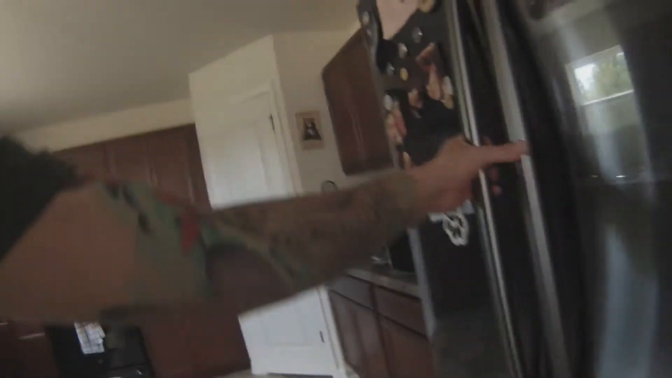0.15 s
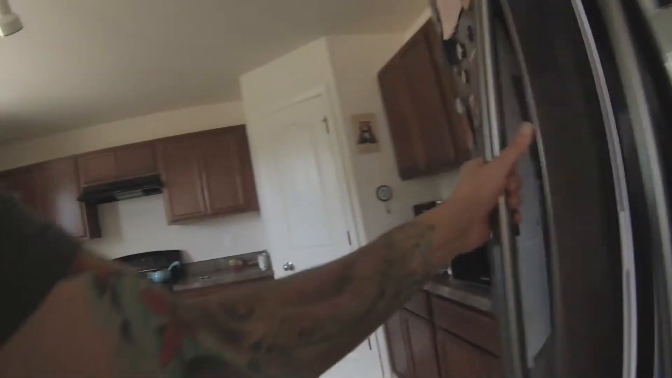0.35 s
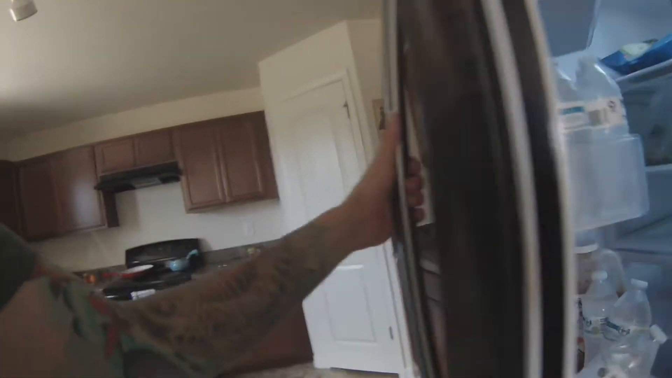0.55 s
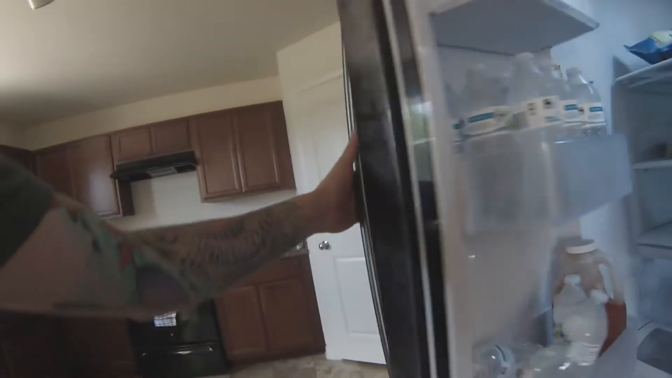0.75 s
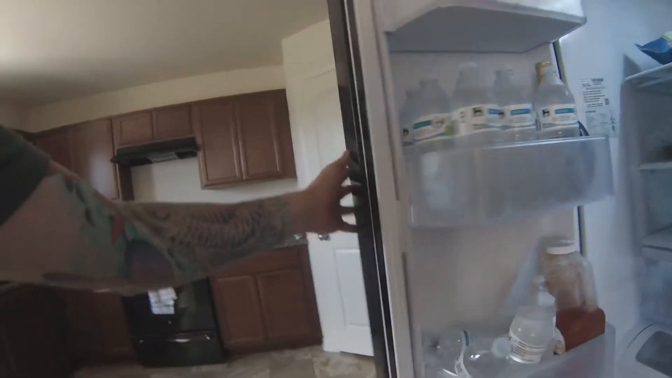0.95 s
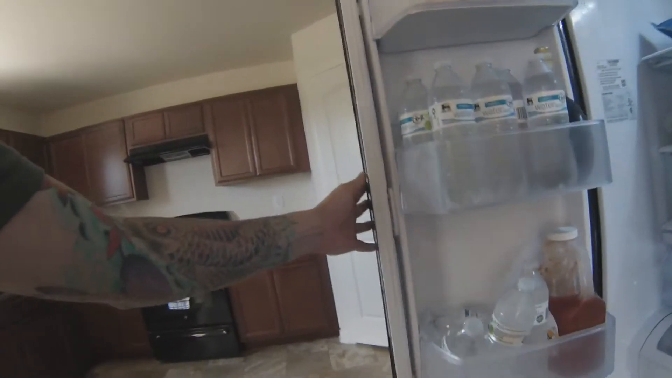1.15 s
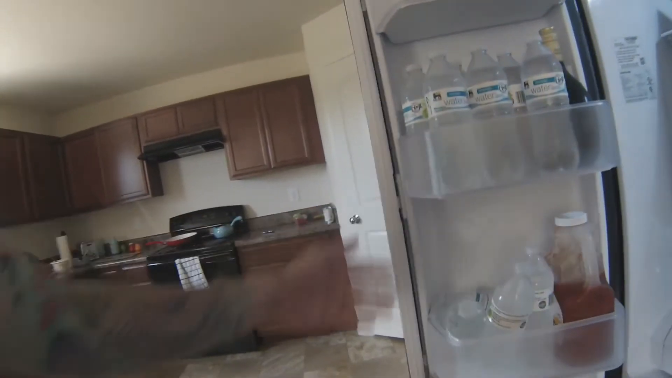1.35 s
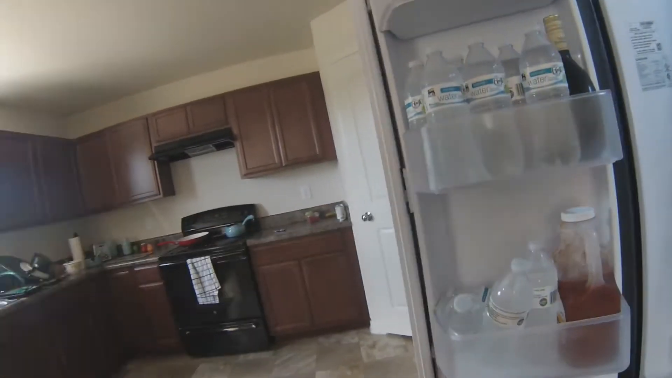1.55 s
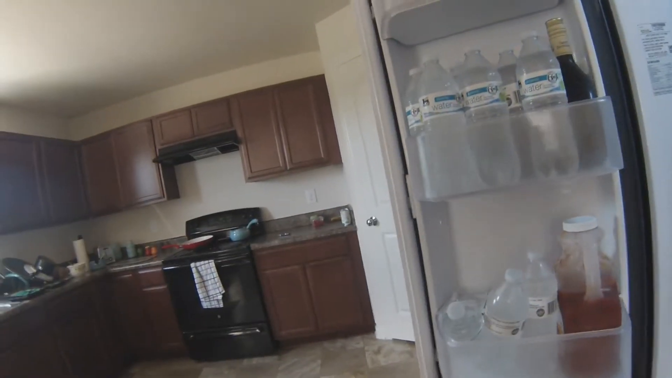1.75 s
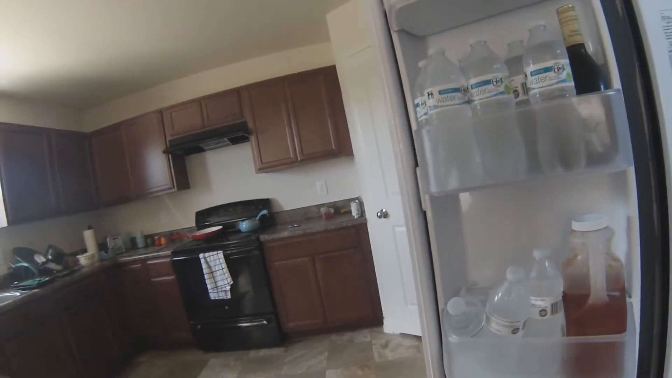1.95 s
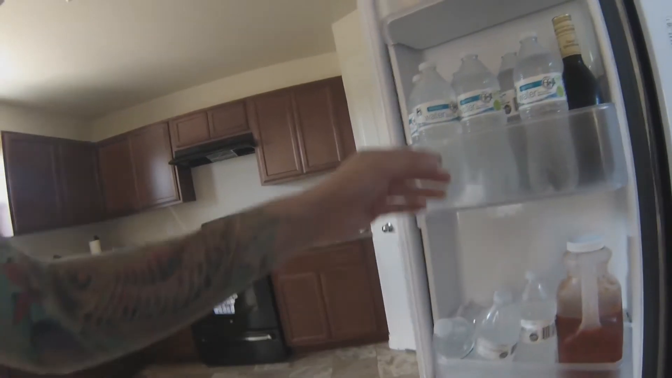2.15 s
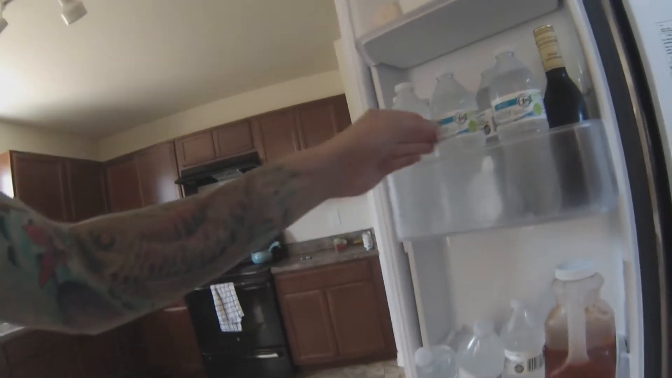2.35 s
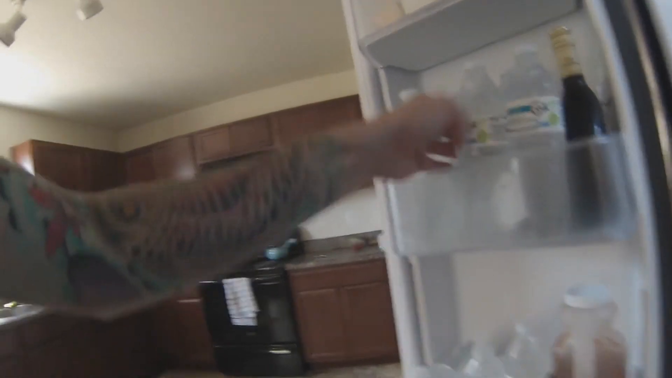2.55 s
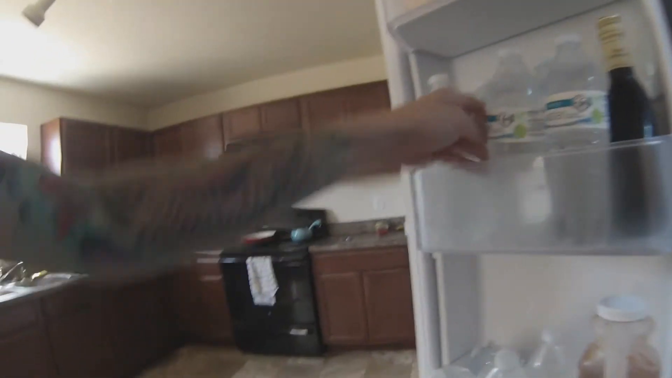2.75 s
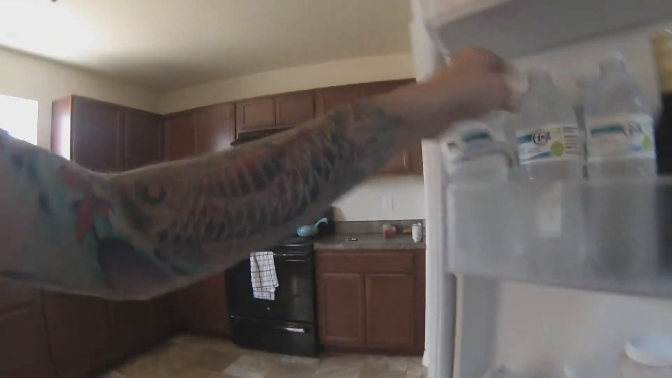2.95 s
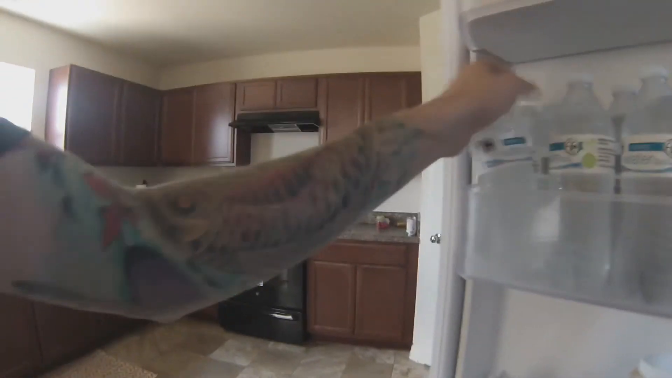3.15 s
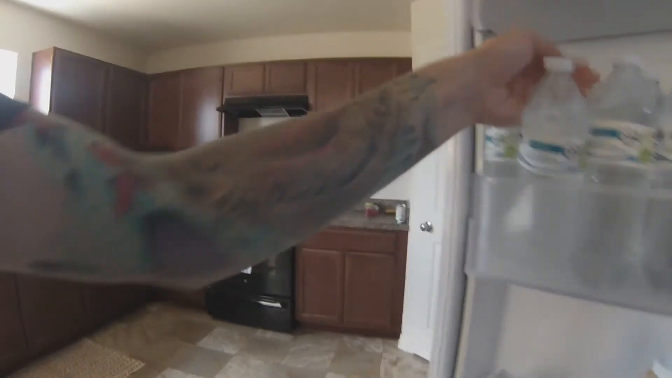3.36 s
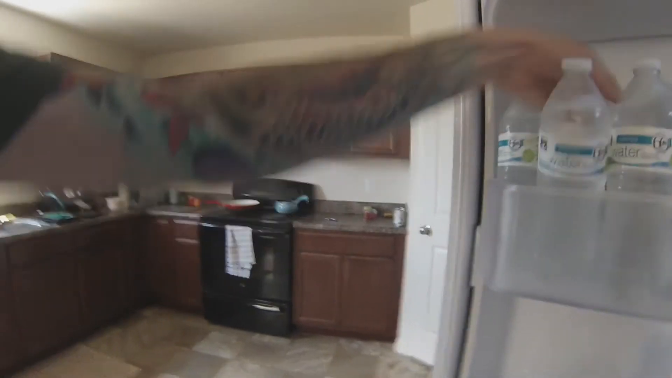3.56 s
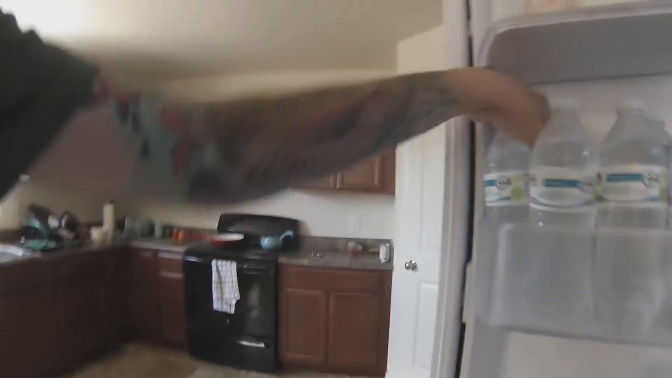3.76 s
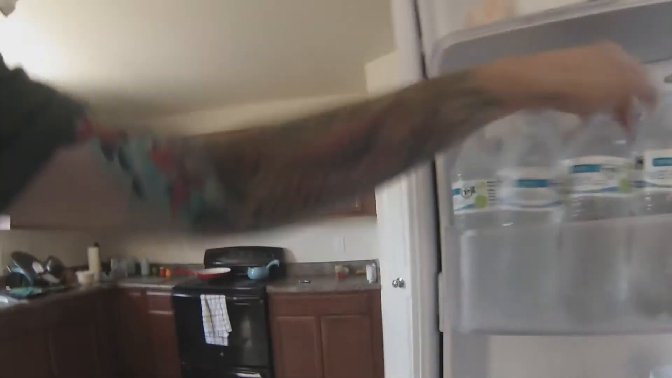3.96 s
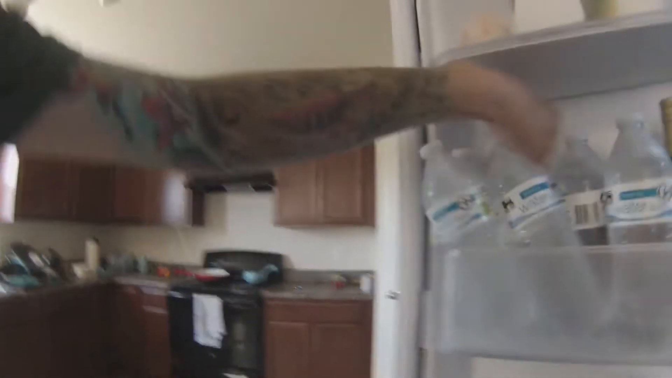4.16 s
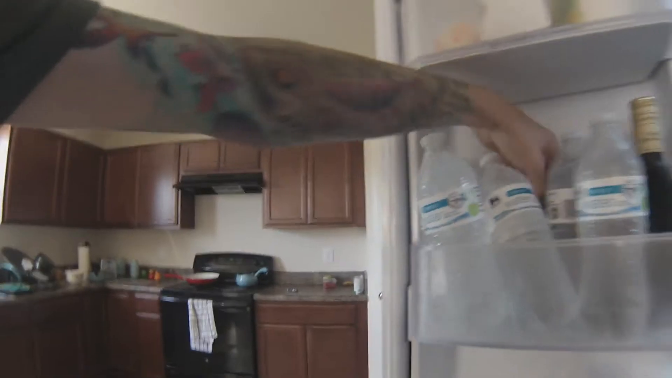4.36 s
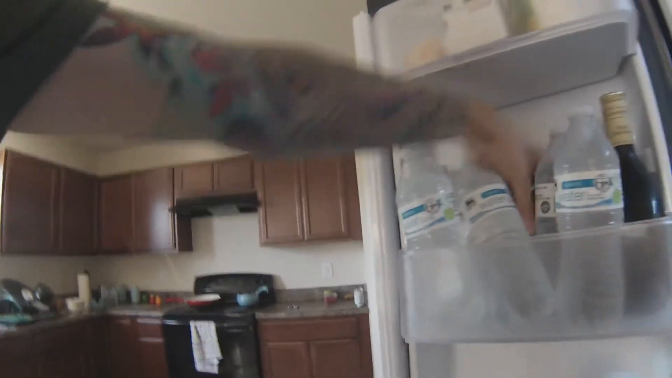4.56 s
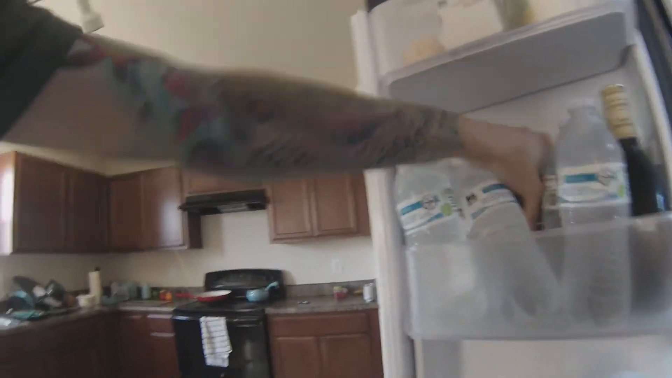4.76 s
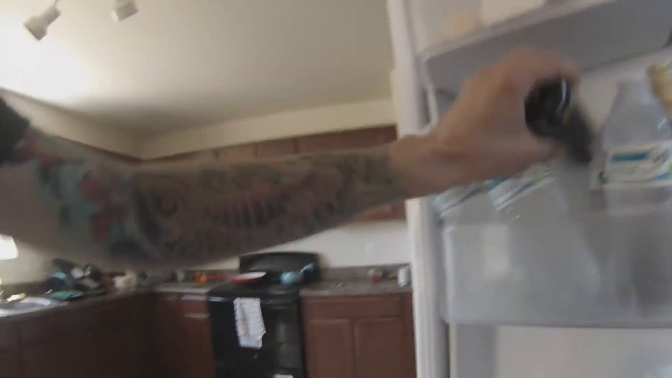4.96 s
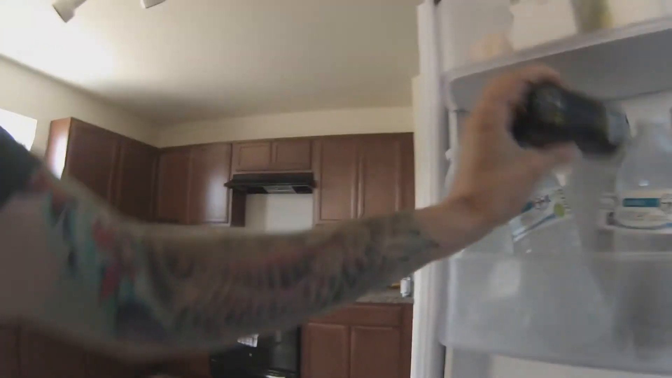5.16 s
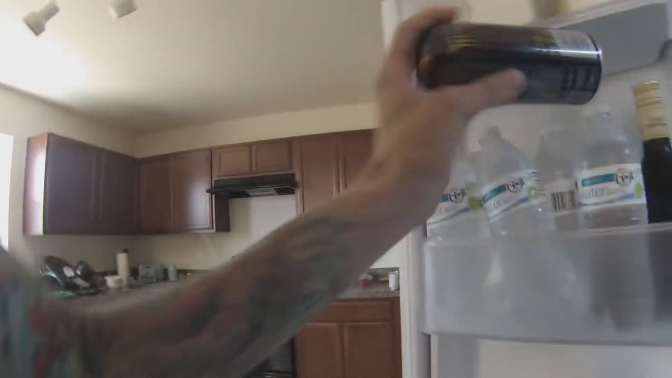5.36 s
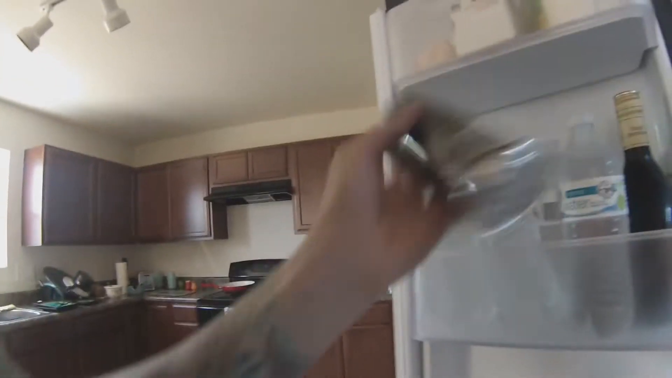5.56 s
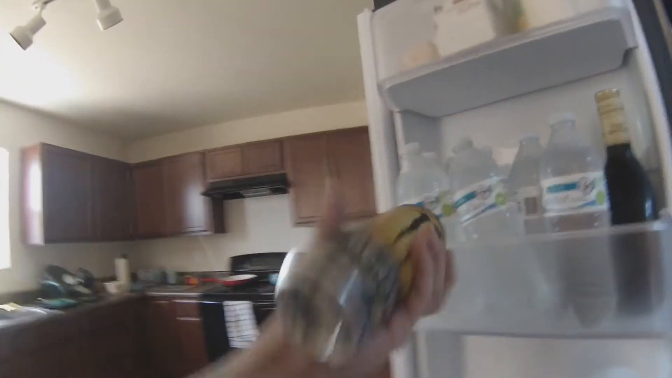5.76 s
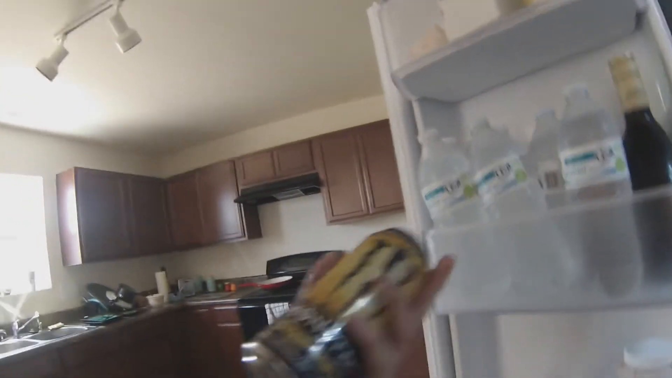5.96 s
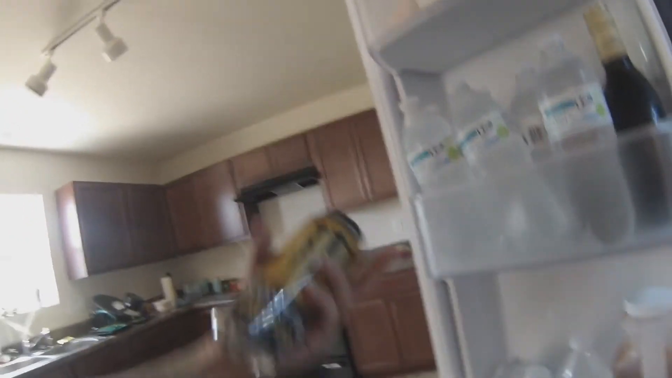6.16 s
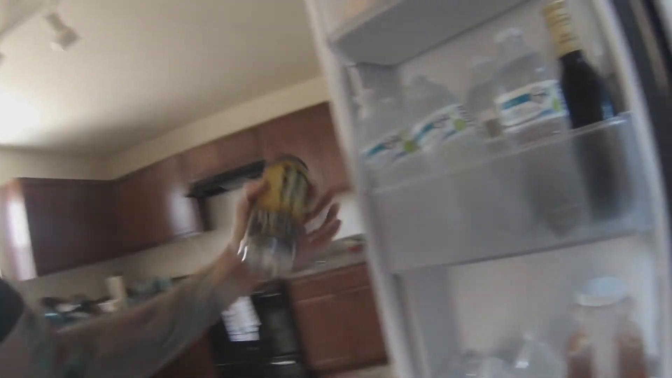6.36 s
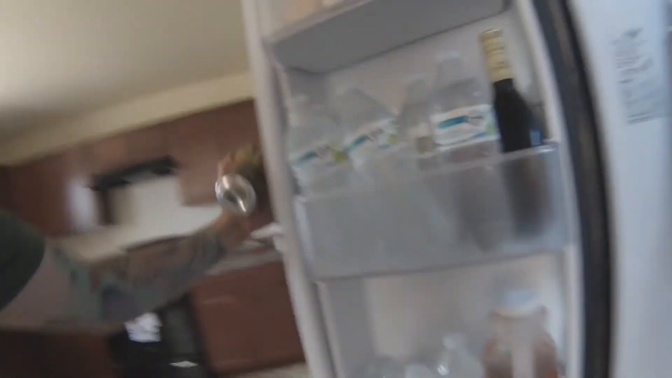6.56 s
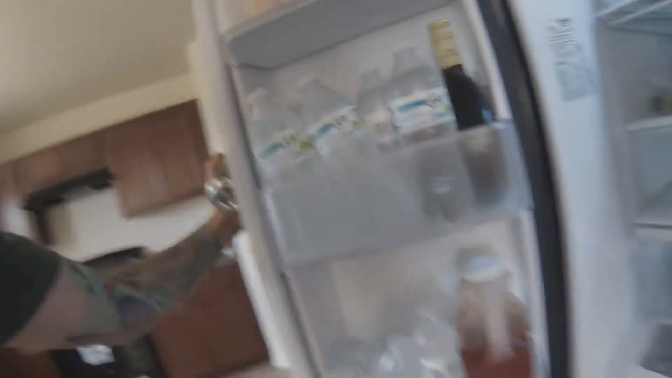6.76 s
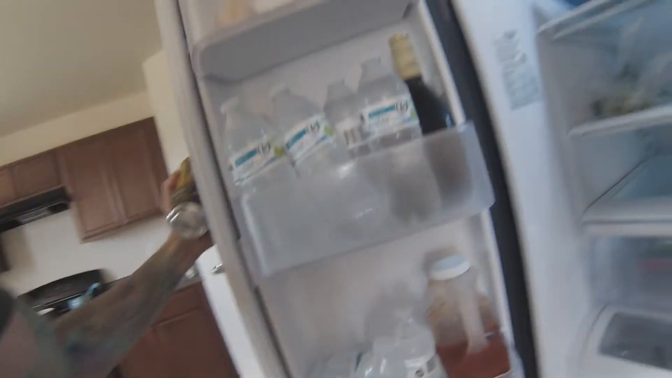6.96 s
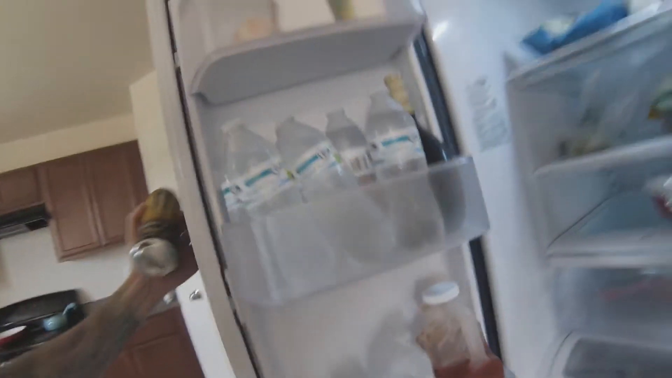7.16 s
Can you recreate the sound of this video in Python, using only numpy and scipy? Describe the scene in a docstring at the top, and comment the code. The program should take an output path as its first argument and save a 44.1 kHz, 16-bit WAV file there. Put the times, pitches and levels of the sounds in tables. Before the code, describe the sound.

A refrigerator door seal peels open with a few dull knocks. After a short lull, a hand digs among full plastic water bottles, which knock in the door bin while their thin shells crackle and rub. A can clinks free, and near the end a hand slaps the door. It is all close, in a slightly echoing kitchen, with soft bumps on a body-worn microphone and a faint fan rush.

```python
"""A hard-walled kitchen, at arm's length from the refrigerator, on a body-worn mono microphone.
The door seal peels open and a hand digs a can out from behind water bottles. Full bottles knock in the
plastic door bin and rock the door, their thin shells crackle and rub, and the can clinks free.
The hand slaps the door at the end. The microphone is bumped now and then, and the faint, steady rush
of the refrigerator fan and the room lies underneath."""
import sys
import numpy as np
from scipy import signal
from scipy.fft import rfft, irfft
from scipy.io import wavfile
from scipy.ndimage import uniform_filter1d, map_coordinates

SR = 44100
rng = np.random.default_rng(int(sys.argv[2]) if len(sys.argv) > 2 else 0)


def generate_wav(signal):
    """Clip the signal to [-1, 1] and save it as 16-bit WAV at the path in sys.argv[1]."""
    frames = np.transpose(np.atleast_2d(signal))
    scaled = np.clip(frames, -1, 1) * 32767
    pcm = np.round(scaled).astype(np.int16)
    wavfile.write(sys.argv[1], SR, pcm)


N = 321644
TIME = np.arange(N) / SR
# relative pitch spread from the hand's squeeze, the water in a bottle and the door's shifting load
GRIP_DETUNE, FILL_DETUNE, LOAD_DETUNE = 0.018, 0.01, 0.04


def undb(db):
    """Decibels to gain."""
    return 10 ** (np.asarray(db) / 20)


def unit(x):
    """Scale to rms 1."""
    return x / np.sqrt(np.mean(x ** 2))


def decay(t, t60):
    """Gain that falls by 60 dB every t60 seconds."""
    return np.exp(-np.log(1000) * t / t60)


def add(track, s, sound):
    """Mix a sound into the track at time s."""
    start = max(int(s * SR), 0)
    track[start:start + len(sound)] += sound[:max(N - start, 0)]


def band(x, lo_hz, hi_hz, order=2):
    """Causal band-pass."""
    sos = signal.butter(order, [lo_hz, min(hi_hz, SR / 2 - 1)], "band", fs=SR, output="sos")
    return signal.sosfilt(sos, x)


def swell(s, length, attack_s, release_s):
    """Gain of one movement: up 30 dB over attack_s, held from s for its length, down 30 per release_s."""
    outside = np.maximum(s - TIME, 0) / attack_s + np.maximum(TIME - s - length, 0) / release_s
    return undb(-30 * outside)


def body(modes, lo_hz, hi_hz, dense_db):
    """Impulse response of an object: its main modes over a flat bed that stands for crowded weak ones."""
    t = np.arange(SR // 8) / SR
    ring = undb(dense_db) * (t == 0)
    for hz, width, db in modes:
        gain = undb(db) * 2 * np.pi * width / SR
        ring += gain * np.exp(-np.pi * width * t) * np.cos(2 * np.pi * hz * t)
    return band(ring, lo_hz, hi_hz)


def detuned(ring, spread):
    """The same ring a little higher or lower: no two bottles or grips are alike."""
    speed = np.exp(spread * rng.standard_normal())
    return map_coordinates(ring, [np.arange(len(ring)) * speed], order=3)


def spot(ring, hz, span, rest_db):
    """An object's ring when struck where the modes near one pitch answer most."""
    return band(ring, hz / (1 + span), hz * (1 + span), order=1) + undb(rest_db) * ring


def strike(ring, t60, build_s, push):
    """One contact: a first push, then a swelling and dying chatter of tiny impacts, rings an object."""
    t = np.arange(SR // 5) / SR
    chatter = rng.standard_normal(len(t)) * decay(t, t60) * (1 - np.exp(-t / build_s)) ** 2
    force = chatter / np.linalg.norm(chatter) + push * (t == 0)
    sound = signal.fftconvolve(force, ring)
    return sound / np.sqrt(uniform_filter1d(sound ** 2, size=512).max())  # loudest moment at rms 1


def grains(ring, rate, spread_db):
    """Stick-slip: random little slips of uneven size, `rate` a second, ring an object."""
    size = undb(spread_db * np.minimum(rng.exponential(size=N), 4))
    slips = (rng.random(N) < rate / SR) * size * rng.choice([-1, 1], N)
    return unit(signal.fftconvolve(slips, ring)[:N])


# room tone all around the microphone: (frequency [Hz], relative spectral level [dB])
ROOM_TONE = [(15, -10.5), (25, -2.5), (53, -0.5), (108, -13.5), (166, -7), (263, -14), (427, -8),
             (463, -13), (516, -11), (624, -15.5), (695, -13), (2760, -23.5), (3250, -25), (11600, -40),
             (16000, -48)]
def room_tone():
    """Steady rush of the refrigerator fan and the room."""
    hz, db = np.transpose(ROOM_TONE)
    freqs = np.maximum(np.fft.rfftfreq(N, 1 / SR), 1)
    colour = undb(np.interp(np.log(freqs), np.log(hz), db))
    return undb(-55) * unit(irfft(rfft(rng.standard_normal(N)) * colour, N))


# echo off the hard surfaces around the microphone: (frequency [Hz], t60 [s], relative level [dB])
KITCHEN_ECHO = [(100, 0.24, -3), (252, 0.38, -4.5), (700, 0.33, -7), (1800, 0.44, -7.5), (4800, 0.33, -6.5),
                (12000, 0.27, -4.5)]
def kitchen_echo(x, build_s=0.0032, positions=20):
    """Dense echo of cabinets, floor and walls; its fine pattern changes as arm and microphone move."""
    t = np.arange(2 * SR // 3) / SR
    hz, t60s, dbs = np.transpose(KITCHEN_ECHO)
    echoes = np.zeros((positions, len(t)))
    for octave_hz in 63 * 2. ** np.arange(9):
        t60, db = (np.interp(np.log(octave_hz), np.log(hz), column) for column in (t60s, dbs))
        fade = decay(t, t60) * (1 - np.exp(-(t / build_s) ** 2))
        noise = band(rng.standard_normal(echoes.shape), octave_hz / 2 ** .5, octave_hz * 2 ** .5, order=3)
        echoes += undb(db) * fade / np.linalg.norm(fade) * noise
    out, hop = np.zeros(N), N // positions
    for k, echo in enumerate(echoes):
        piece = x[k * hop:(k + 2) * hop]
        crossfade = np.sin(np.linspace(0, np.pi, len(piece)))
        add(out, k * hop / SR, signal.fftconvolve(piece * crossfade, echo))
    return out


# the microphone's mount creaks dully as the arm swings the door: (time [s], length [s], level [dB])
MOUNT_SWAYS = [(0.91, 0.275, -47.5), (3.102, 0.051, -46)]
def mount_sway():
    """The mount shifts in small, uneven slips that make a low rattle."""
    mount = body([(32.7, 14, 4), (70, 30, -13)], 9.3, 170, dense_db=-7)
    gain = sum(undb(db) * swell(s, length, 0.31, 0.083) for s, length, db in MOUNT_SWAYS)
    return grains(mount, rate=90, spread_db=6.5) * gain


# soft bumps right on the microphone's body: (time [s], level [dB], pitch [Hz], t60 [s])
MIC_BUMPS = [(.873, -39, 75.6, 0.073), (0.995, -36, 56, 0.21), (1.147, -30.5, 91.5, 0.031),
             (1.177, -36, 52.7, 0.11), (2.197, -35.5, 241, 0.024), (3.108, -23, 115, 0.033),
             (3.142, -19, 87.5, 0.023), (5.05, -31.5, 55.4, 0.062)]
def mic_bumps(rise_s=0.00062):
    """A nudge rocks the microphone's mount for a few cycles, and clothing rubs dully against it."""
    out, t = np.zeros(N), np.arange(SR // 3) / SR
    for s, db, hz, t60 in MIC_BUMPS:
        rock = 2 * np.sin(2 * np.pi * hz * t) * decay(t, t60)
        rub = undb(-11.5) * unit(band(rng.standard_normal(len(t)), 34, 132)) * decay(t, 0.32)
        add(out, s, undb(db) * (rock + rub) * (1 - np.exp(-t / rise_s)))
    return out


# fingers shifting their grip on the door, an arm's length away: (time [s], length [s], level [dB])
FINGER_GRIPS = [(0, .11, -65.5), (0.705, 0.36, -76), (1.297, 0.073, -74), (7.005, 0.21, -71)]
def finger_rustle(edge):
    """Skin creeps over the handle and the door's edge with a faint, dry rustle."""
    rustle = unit(band(grains(edge, rate=2000, spread_db=-1), 9700, 14400, order=1))
    return rustle * sum(undb(db) * swell(s, length, 0.05, 0.075) for s, length, db in FINGER_GRIPS)


# the seal peeling off in front of the microphone: (time [s], relative level [dB])
SEAL_PEEL = [(0, -47.5), (.1, -58), (.24, -44.5), (.42, -54.5), (.65, -61.5)]
def door_seal(door_bin, bottle, shell, edge):
    """The rubber seal lets go in small tears over a low suck of air."""
    tears = (undb(-4.5) * grains(door_bin, rate=500, spread_db=0.5)
             + undb(-7) * grains(bottle, rate=570, spread_db=1)
             + undb(-13.5) * grains(shell, rate=270, spread_db=2)
             + undb(-19.5) * grains(edge, rate=1400, spread_db=2))
    suction = undb(-4) * unit(band(rng.standard_normal(N), 34, 156))
    s, db = np.transpose(SEAL_PEEL)
    return (tears + suction) * undb(np.interp(TIME, s, db, left=-120, right=-120))


# the open door rocks on its hinges when weight shifts in the bin: (time [s], level [dB])
DOOR_SHUDDERS = [(2.469, -40.5), (2.921, -39.5), (3.33, -35.5), (3.499, -43.5), (3.761, -40), (3.991, -31),
                 (4.25, -40), (4.54, -39), (4.79, -47.5), (5.12, -44.5), (5.44, -43.5)]
def door_shudders(swing_hz=58.2, rise_s=0.005, t60=0.96):
    """The heavy door swings briefly at its lowest mode; shelves and hinges rumble along."""
    out, t = np.zeros(N), np.arange(SR) / SR
    fade = (1 - np.exp(-t / rise_s)) * decay(t, t60)
    for s, db in DOOR_SHUDDERS:
        swing = detuned(np.sin(2 * np.pi * swing_hz * t), LOAD_DETUNE)
        rumble = undb(-4) * unit(band(rng.standard_normal(len(t)), 44, 120))
        add(out, s, undb(db) * fade * (swing + rumble))
    return out


# resonances of the door's panel and skin: (frequency [Hz], width [Hz], level [dB])
PANEL_MODES = [(56, 10, 9.1), (170.5, 29, 13), (226, 26, 4), (330, 59, 5)]
SKIN_MODES = [(820, 200, 7.5), (1430, 300, 1), (1820, 180, -12), (2080, 99, -20)]
# hand and can bump the door close by: (time [s], relative boom [dB], relative clank [dB], chatter t60 [s])
DOOR_BLOWS = [(.035, -38, -63, 0.047), (0.14, -32.5, -37, 0.11), (0.243, -48, -29, .05),
              (.302, -33, -37, 0.083), (0.413, -30.5, -62, .09), (1.051, -36.5, -52, 0.089),
              (1.321, -35.5, -35, 0.38), (1.383, -37, -48, 0.12), (6.7535, -17, -12.5, 0.031),
              (6.771, -17.5, -30, 0.052), (6.803, -30.5, -27.5, 0.32), (6.961, -37, -58, 0.044),
              (7.004, -24.5, -46, 0.053)]
def door_blows(boom_gain_db, clank_gain_db):
    """The foam-filled panel booms and its steel skin gives a short, dull clank."""
    panel = body(PANEL_MODES, 32, 370, dense_db=-2.5)
    skin = body(SKIN_MODES, 660, 2500, dense_db=-5)
    out = np.zeros(N)
    for s, boom_db, clank_db, t60 in DOOR_BLOWS:
        add(out, s, undb(boom_db + boom_gain_db) * strike(panel, t60, build_s=0.0034, push=0.27))
        add(out, s, undb(clank_db + clank_gain_db) * strike(skin, t60, build_s=0.00088, push=0.07))
    return out


# resonances of the can's lid: (frequency [Hz], width [Hz], level [dB])
LID_MODES = [(3100, 110, 2), (4500, 260, -5)]
def lid_ping(s=4.887, db=-34.5):
    """The can's thin lid answers the flick of a fingertip with a short ping."""
    lid = body(LID_MODES, 2000, 9000, dense_db=-24)
    out = np.zeros(N)
    add(out, s, undb(db) * strike(lid, t60=0.0064, build_s=0.00086, push=0.88))
    return out


# resonances of the full can and of its hard rim: (frequency [Hz], width [Hz], level [dB])
CAN_MODES = [(947, 36, 6.5), (1000, 40, 1), (1055, 40, 1.5), (1230, 27, 0), (1850, 110, -13),
             (2200, 95, -16)]
RIM_MODES = [(1750, 180, 9.2), (2820, 200, 5.1), (3580, 270, 12), (3950, 230, 3), (4730, 260, 8),
             (5100, 200, 6.3), (6330, 130, 8.5)]
# at arm's length the can clicks free of the bottles, then knocks against them as it is tipped out:
# (time [s], clonk level [dB], clink level [dB], chatter t60 [s], build-up [s])
CAN_KNOCKS = [(4.973, -37, -19.5, 0.029, 0.000059), (5.007, -35.5, -48, 0.031, 0.0028),
              (5.281, -20.5, -38, 0.036, 0.0013), (5.295, -31.5, -53, 0.097, 0.00064)]
def can_knocks():
    """The full can gives a hollow clonk when its side is hit and a bright clink when its rim catches."""
    side = body(CAN_MODES, 880, 2800, dense_db=-16)
    rim = body(RIM_MODES, 1150, 13500, dense_db=-12)
    out = np.zeros(N)
    for s, clonk_db, clink_db, t60, build_s in CAN_KNOCKS:
        hardness = np.exp(-build_s / 0.0013)
        add(out, s, undb(clonk_db) * strike(side, t60, build_s, push=2 * hardness))
        add(out, s, undb(clink_db) * strike(rim, t60, build_s, push=0.59 * hardness))
    return out


# resonances of the plastic in the open door: (frequency [Hz], width [Hz], level [dB])
BIN_MODES = [(181.3, 30, 1), (219, 28, 0), (273, 13, -2), (355, 60, -3.5), (396, 63, -0.5),
             (457, 17, -11.5)]
BOTTLE_MODES = [(623, 28, 9.7), (710, 17.5, 11.7), (795, 98, 9.2), (885, 86, 5.6), (1000, 160, 3.6),
                (1170, 123, 6.2), (1258, 12, 2.2)]
SHELL_MODES = [(1800, 100, 6.7), (1920, 190, 6.8), (2240, 190, 5), (2630, 320, 1.9), (3007, 470, 4.5),
               (3606, 82, 4.2), (3910, 81, 2.7)]
EDGE_MODES = [(4540, 410, 3), (5190, 1300, 5.5), (5800, 270, 0), (6450, 210, 1), (7870, 2700, -4),
              (10300, 3800, -21), (13800, 2800, -9.5)]
def plastic_rings():
    """Impulse responses of the door bin, a full bottle, its thin shell and a crack's treble edge."""
    return (body(BIN_MODES, 97, 504, dense_db=-5), body(BOTTLE_MODES, 610, 1380, dense_db=0),
            body(SHELL_MODES, 1450, 5000, dense_db=0), body(EDGE_MODES, 3200, 14100, dense_db=-10))


# close by, the hand drags bottles against each other and the bin:
# (time [s], length [s], relative rubbing [dB], relative crinkling [dB])
BOTTLE_DRAGS = [(2.481, 0.063, -33.5, -44.5), (2.915, 0.046, -34.5, -43.5), (3.282, 0.069, -27, -37.5),
                (3.615, 0.54, -36, -47), (4.118, 0.16, -28, -41.5), (4.496, 0.16, -39.5, -53.5),
                (4.765, .08, -41.5, -50), (4.838, .18, -39, -47), (5.165, .29, -38.5, -59)]
def bottle_drags(door_bin, bottle, shell, edge):
    """Heavy bottles judder along the bin while shells and labels crinkle in a stream of small snaps."""
    rub_gain, crinkle_gain = np.zeros(N), np.zeros(N)
    for s, length, rub_db, crinkle_db in BOTTLE_DRAGS:
        movement = swell(s, length, attack_s=0.16, release_s=0.38)
        rub_gain = np.maximum(rub_gain, undb(rub_db) * movement)
        crinkle_gain = np.maximum(crinkle_gain, undb(crinkle_db) * movement)
    rub = (undb(-6) * grains(door_bin, rate=500, spread_db=1)
           + undb(-9.5) * grains(bottle, rate=870, spread_db=0))
    crinkle = (undb(-6) * grains(shell, rate=1400, spread_db=4)
               + undb(-10) * grains(edge, rate=400, spread_db=2.5))
    snap = strike(shell + undb(-8.5) * edge, t60=0.022, build_s=0.0016, push=0.046)
    crinkle += undb(-6) * grains(snap, rate=180, spread_db=6)
    return rub * rub_gain + crinkle * np.hypot(crinkle_gain, creasing())


# at arm's length, thin plastic buckling under the hand, and the sharp click of the closing door slap:
# (time [s], relative level [dB], ring pitch [Hz], relative treble edge [dB], build-up [s])
CRACKS_AND_CLICKS = [(0.242, -29, 2600, -22, 0.0012), (0.7562, -49, 2460, -1.5, 0.00093),
                     (1.3334, -33, 1800, -13.5, 0.00067), (1.385, -41.5, 4180, -15, 0.00091),
                     (1.6967, -33.5, 1720, -15, 0.0011), (2.459, -32, 1850, -9, 0.00053),
                     (2.496, -26, 1640, -19, .004), (2.563, -31, 1750, -13, 0.0017),
                     (2.614, -33.5, 2000, -36, 0.0018), (2.823, -25.5, 1900, -35, 0.00063),
                     (2.8833, -32.5, 3630, -5, 0.0021), (2.902, -16.5, 2580, -13, 0.0011),
                     (2.911, -22.5, 2670, -8.5, 0.0013), (2.9698, -34, 1960, -3.5, .002),
                     (3.025, -34.5, 2400, -29, .001), (3.103, -32.5, 4000, -17, 0.00089),
                     (3.195, -28.5, 3700, -3, 0.00086), (3.269, -16.5, 1770, -9, 0.00083),
                     (3.288, -21.5, 1870, -11, 0.0016), (3.302, -11, 2940, -18, 0.00067),
                     (3.3276, -11, 2680, -20, 0.0016), (3.3566, -18.5, 1970, -11, 0.00054),
                     (3.446, -43, 1820, -12, 0.0009), (3.564, -27, 2070, -15.5, 0.00062),
                     (3.617, -33, 2300, -12, .002), (3.633, -23, 2240, -6.5, 0.0036),
                     (3.674, -28.5, 3850, -10, 0.0014), (3.703, -30.5, 2100, -28, 0.0016),
                     (3.767, -15.5, 2220, -13.5, 0.0012), (3.8228, -26, 2010, -9, 0.00091),
                     (3.867, -27.5, 2940, -12, 0.0017), (3.888, -29, 2940, -29, 0.0024),
                     (3.949, -18, 1860, -12.5, 0.00029), (3.97, -22.5, 2240, -21, 0.005),
                     (3.9854, -8.5, 1940, -16.5, 0.0016), (4.092, -32, 2400, -17, 0.00042),
                     (4.132, -18, 1750, -29, .002), (4.157, -23, 2960, -11, 0.0024),
                     (4.188, -12.5, 2140, -12.5, 0.00072), (4.211, -9, 2900, -19.5, 0.0021),
                     (4.244, -20, 2800, -10.5, 0.0012), (4.284, -20.5, 2620, -15, 0.0012),
                     (4.305, -20.5, 1760, -14.5, 0.00095), (4.334, -30, 3000, -14, .001),
                     (4.369, -19.5, 2300, -18.5, 0.0017), (4.506, -33.5, 2240, -29.5, .001),
                     (4.537, -30, 2240, -18, 0.00085), (4.6058, -30.5, 2820, -18, .0005),
                     (4.627, -31, 2840, -13, 0.00093), (4.6972, -32.5, 2790, -21, 0.00035),
                     (4.737, -45, 2580, -23, .0006), (4.765, -35.5, 2950, -1.5, 0.0011),
                     (4.819, -35.5, 3000, -4, .0006), (4.871, -35.5, 2200, -5, .001),
                     (4.8863, -28.5, 3170, -8, 0.00042), (4.9537, -40, 3700, -9, 0.0005),
                     (5.012, -19, 2800, -7.5, 0.001), (5.072, -35.5, 4690, -0.5, 0.003),
                     (5.146, -30, 3140, -12, 0.0022), (5.182, -28, 3060, -10.5, 0.00093),
                     (5.2468, -20, 1730, -12, 0.0011), (5.2799, -23, 2900, -18, 0.00058),
                     (5.444, -34.5, 2400, -28, .002), (5.7237, -35, 1970, -19, 0.0015),
                     (5.891, -46, 1920, -11, 0.00092), (6.755, -24, 1670, -16.5, 0.001),
                     (7.027, -45, 1910, -5, 0.0013), (7.182, -51, 4440, 2, 0.0013)]
def cracks_and_clicks(bottle, shell, edge):
    """A dent gives way, at once or in a run of creases, and jolts its bottle; the slap clicks alike."""
    out = np.zeros(N)
    for s, db, hz, edge_db, build_s in CRACKS_AND_CLICKS:
        crack = spot(detuned(shell, GRIP_DETUNE), hz, span=0.075, rest_db=0)
        jolt = undb(-1.5) * detuned(bottle, FILL_DETUNE)
        t60 = 0.039 * 2400 / hz  # smaller, higher dents snap through faster
        push = 0.87 * np.exp(-build_s / 0.0016)  # a slow crumple has no opening snap
        add(out, s, undb(db - 11.5) * strike(crack + jolt, t60, build_s, push))
        add(out, s, undb(db + edge_db - 4.5) * strike(edge, 0.77 * t60, build_s, push=0.14))
    return out


def creasing(rise_s=0.018, fade_s=0.08):
    """Gain over time of the fine creases that spread around the loudest quarter of the cracks."""
    loudest = sorted(CRACKS_AND_CLICKS, key=lambda row: -row[1])[:len(CRACKS_AND_CLICKS) // 4]
    return sum(undb(db - 36.5) * swell(s + rise_s, 0, rise_s, fade_s) for s, db, *_ in loudest)


# bottles and can strike the door bin, just in front of the microphone:
# (time [s], relative thud [dB], thud pitch [Hz], relative clack [dB], clack pitch [Hz], chatter t60 [s])
BOTTLE_KNOCKS = [(0.157, -45, 355, -38, 1000, 0.012), (.226, -54, 273, -29, 1258, 0.085),
                 (1.697, -36, 136, -41, 710, 0.078), (2.495, -14.5, 167, -17, 1190, 0.022),
                 (2.51, -17, 480, -17.5, 800, 0.025), (2.563, -28, 384, -24.5, 1200, 0.1),
                 (2.617, -29.5, 386, -32, 830, 0.024), (2.826, -33.5, 225, -30.5, 810, 0.069),
                 (2.859, -31, 433, -24, 740, 0.043), (2.903, -18.5, 211, -18, 795, 0.067),
                 (2.933, -21, 224, -23, 730, 0.26), (3.026, -26.5, 293, -22.5, 700, 0.017),
                 (3.195, -24.5, 433, -30, 820, 0.049), (3.29, -19.5, 415, -19, 800, .25),
                 (3.32, -14.5, 367, -12.5, 700, 0.15), (3.336, -7.5, 208, -10.5, 710, 0.036),
                 (3.567, -30, 403, -23, 720, 0.064), (3.637, -20, 303, -19, 810, 0.21),
                 (3.768, -35, 350, -17, 1230, .026), (3.825, -25, 304, -24.5, 1190, 0.17),
                 (3.887, -19, 430, -20.5, 1080, 0.22), (3.96, -11.5, 219, -20.5, 700, 0.11),
                 (3.985, -13.5, 335, -7.5, 860, 0.032), (4.03, -20.5, 396, -23, 885, 0.042),
                 (4.091, -35, 400, -22, 780, 0.036), (4.131, -9.5, 430, -13, 795, .04),
                 (4.16, -19.5, 457, -14.5, 905, 0.041), (4.212, -22, 423, -11, 910, 0.051),
                 (4.249, -8.5, 335, -14.5, 1250, 0.03), (4.289, -21, 407, -15, 1170, 0.044),
                 (4.366, -15.5, 430, -19.5, 1320, 0.043), (4.479, -24.5, 246, -32.5, 820, 0.052),
                 (4.536, -20.5, 248, -18, 750, .03), (4.603, -24.5, 360, -26, 794, .08),
                 (4.697, -24.5, 448, -24, 1160, 0.024), (4.739, -29, 357, -30, 700, .056),
                 (4.853, -23.5, 380, -25, 820, 0.15), (4.879, -28, 424, -23, 910, 0.016),
                 (5.071, -22, 433, -21, 740, 0.027), (5.191, -22.5, 190, -36, 870, 0.07),
                 (5.252, -28, 196, -22, 960, 0.088), (5.282, -17.5, 150, -23, 1020, 0.039),
                 (5.292, -14, 381, -16, 1020, 0.09), (5.723, -37.5, 355, -36, 910, 0.13)]
def bottle_knocks(door_bin, bottle):
    """Each blow thuds in the bin and clacks in a full bottle; the spot it hits favours a pitch in each."""
    out = np.zeros(N)
    for s, thud_db, thud_hz, clack_db, clack_hz, t60 in BOTTLE_KNOCKS:
        thud = spot(detuned(door_bin, LOAD_DETUNE), thud_hz, span=0.078, rest_db=-7.5)
        add(out, s, undb(thud_db - 9) * strike(thud, t60, build_s=0.0035, push=0.64))
        clack = spot(detuned(bottle, FILL_DETUNE), clack_hz, span=0.05, rest_db=-4)
        add(out, s, undb(clack_db - 11) * strike(clack, t60, build_s=0.0014, push=0.46))
    return out


def contacts(door_bin, bottle, shell, edge):
    """Knocks, cracks and clicks as they radiate in one direction; each has its own fine detail."""
    out = bottle_knocks(door_bin, bottle) + cracks_and_clicks(bottle, shell, edge)
    return out + can_knocks() + lid_ping()


def scene():
    """The door and its load close up, the kitchen behind: one microphone on both channels."""
    rings = plastic_rings()
    friction = bottle_drags(*rings) + door_seal(*rings) + finger_rustle(edge=rings[-1])
    direct = friction + contacts(*rings) + door_blows(boom_gain_db=-11, clank_gain_db=-17.5)
    echo = np.zeros(N)
    for _ in range(2):  # sound sent two ways returns from different walls; less of the boom carries
        outgoing = friction + contacts(*rings) + door_blows(boom_gain_db=-14.5, clank_gain_db=-13.5)
        echo += kitchen_echo(outgoing) / np.sqrt(2)
    mono = direct + echo + door_shudders() + mic_bumps() + mount_sway() + room_tone()
    return np.array([mono, mono])


def record(dry):
    """The recorder cuts the top steeply above 15.4 kHz."""
    return signal.sosfilt(signal.ellip(8, .2, 70, 15400, fs=SR, output="sos"), dry)


dry = scene()
out = record(dry)
generate_wav(out)
```